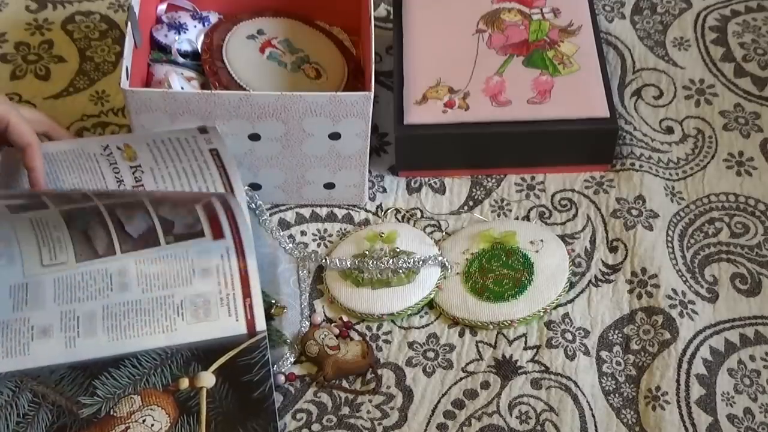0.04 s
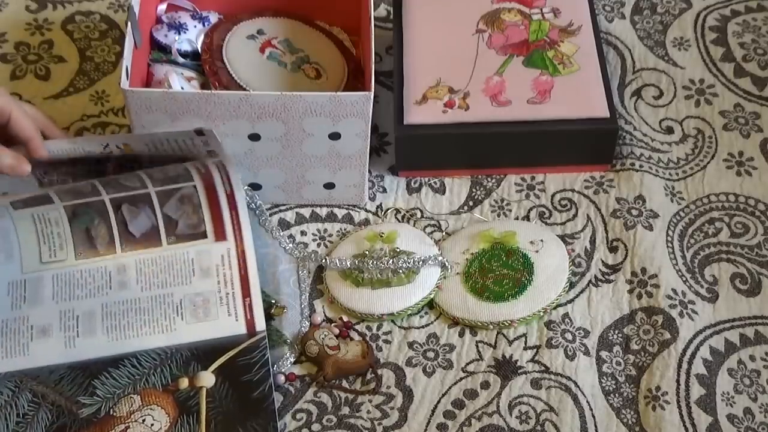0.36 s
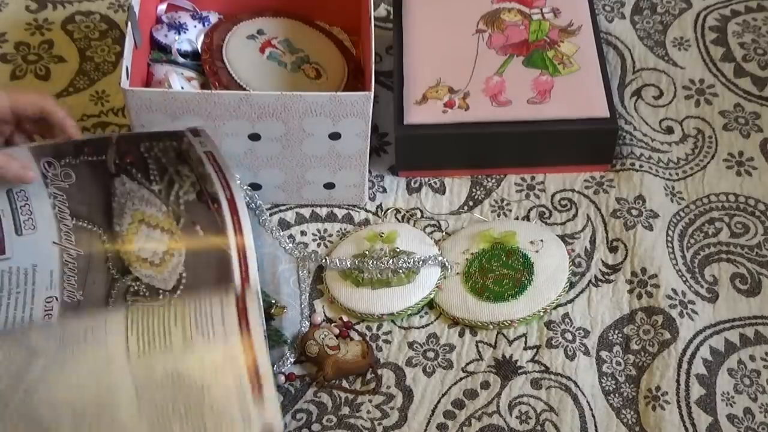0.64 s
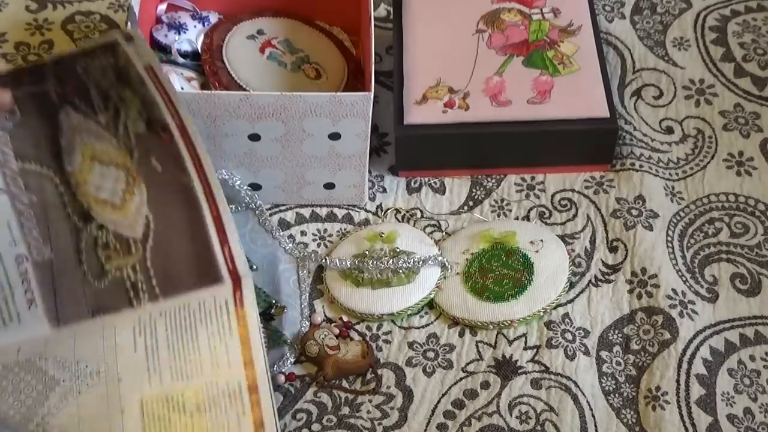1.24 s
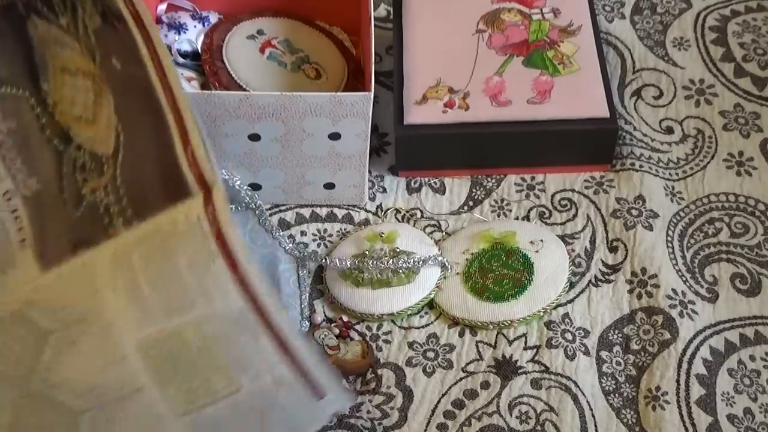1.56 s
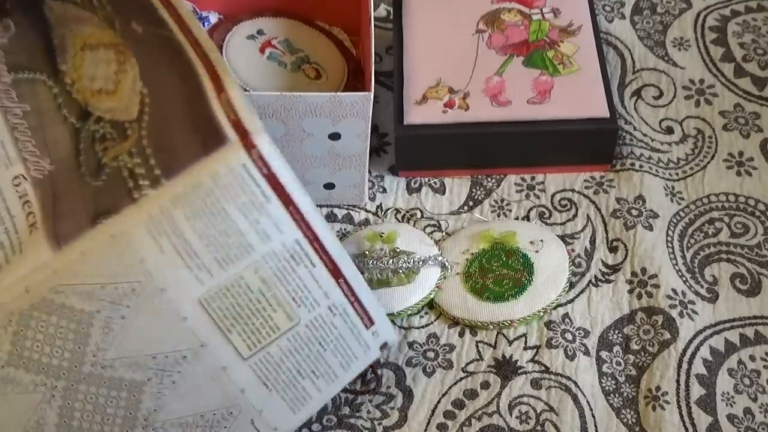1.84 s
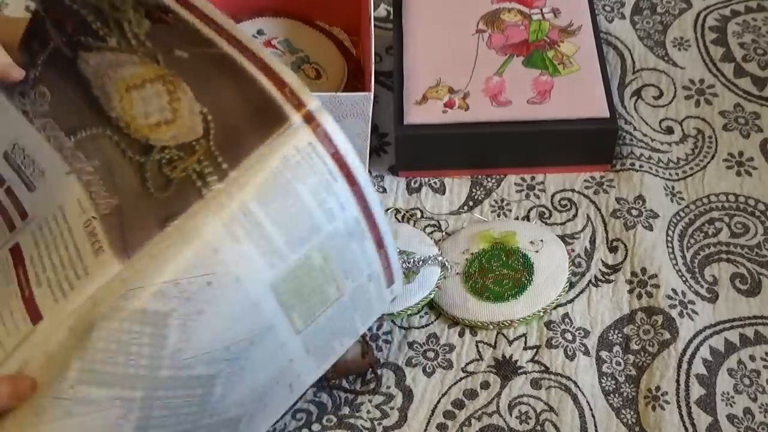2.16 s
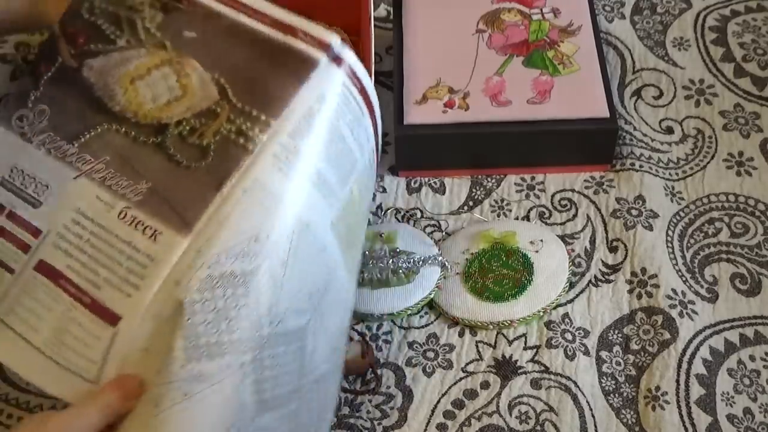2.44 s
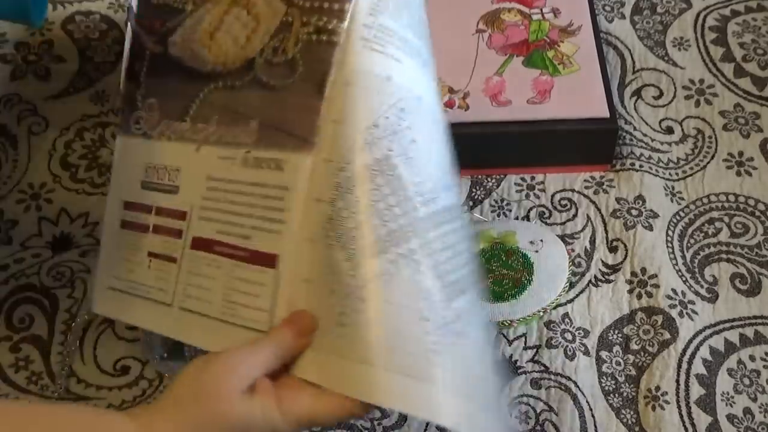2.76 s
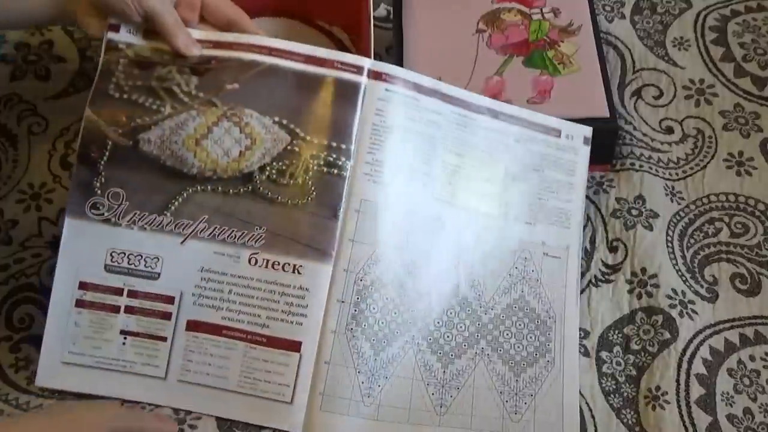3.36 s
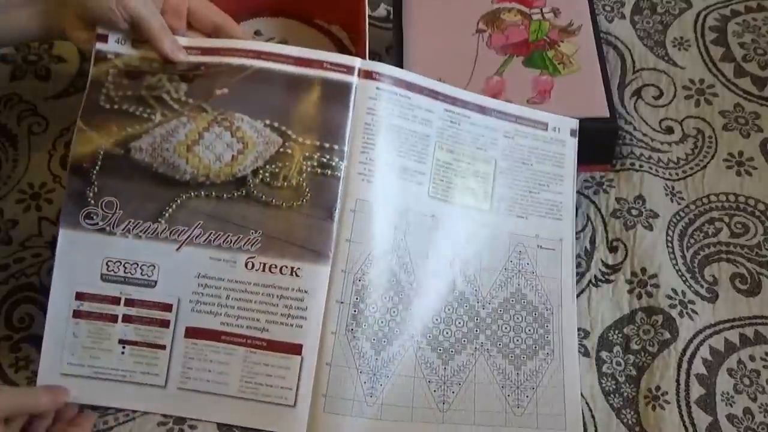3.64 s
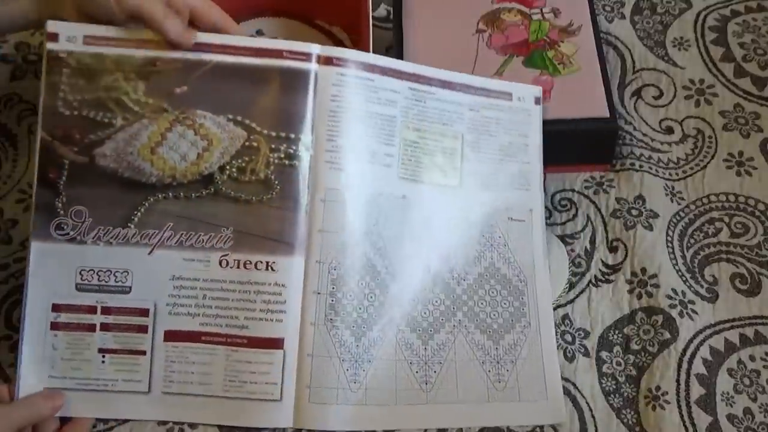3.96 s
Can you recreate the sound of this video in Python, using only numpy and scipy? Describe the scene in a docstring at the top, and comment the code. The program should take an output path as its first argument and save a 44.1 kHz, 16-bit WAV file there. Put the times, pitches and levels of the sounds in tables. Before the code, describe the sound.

Magazine pages rustle close by, starting slightly left with sharp, hollow-sounding snaps in the first 0.4 seconds. Lighter crackles and rasping, hissing slides follow over a soft handling rumple, with dull flaps at about 2.1 to 2.3 seconds. Around 3.1 seconds the pages snap and flap open near the middle. Small ticks and one more slide follow near 3.9 seconds, over the faint hiss of a small, quiet room.

```python
"""Paper rasps and snaps as a glossy magazine is leafed through, turned round and opened on a table.
Sheets slide over each other with a grainy rasp and a fine hiss; they buckle in sharp snaps and land
in dull flaps. The whole stack rumples softly in the hands, and air under the lifted pages rings hollow.
The magazine is close by, starting on the left and ending near the middle of a small, quiet room."""
import sys
import numpy as np
from scipy import signal
from scipy.fft import rfft, irfft, next_fast_len
from scipy.io import wavfile
from scipy.ndimage import map_coordinates

SR = 44100
rng = np.random.default_rng(int(sys.argv[2]) if len(sys.argv) > 2 else 0)


def log_audio(samples):
    """Write samples as a 16-bit WAV file to the path given in sys.argv[1]."""
    # one column per channel
    frames = np.atleast_2d(samples).T
    # limit to full scale, then quantise
    limited = np.clip(frames, -1, 1)
    pcm = np.round(limited * 32767).astype(np.int16)
    wavfile.write(sys.argv[1], SR, pcm)


N = 176400  # 4 seconds
FFT_SIZE = next_fast_len(N + SR // 2)  # spare room so that filters can ring out
FFT_HZ = np.fft.rfftfreq(FFT_SIZE, 1 / SR)


def amp(db):
    """Turn decibels into a number to multiply by."""
    return 10 ** (np.asarray(db) / 20)


def unit(x):
    """Scale a sound so that its average (rms) level is 1."""
    return x / np.sqrt(np.mean(x ** 2) + 1e-20)


def unit_energy(stereo):
    """Scale a stereo sound so that its left side has a total energy of 1."""
    return stereo / np.linalg.norm(stereo[0])


def along(points, hz):
    """Read between (Hz, value) points, giving each octave equal space."""
    point_hz, values = np.transpose(points)
    return np.interp(np.log(hz + 1), np.log(point_hz + 1), values)


def curve(points):
    """Join (seconds, value) points with straight lines, one value for each sample."""
    return np.interp(np.arange(N) / SR, *np.transpose(points))


def wobble(per_s, size):
    """A smooth curve through per_s random values each second."""
    return map_coordinates(rng.standard_normal(2048), [np.arange(size) * per_s / SR], mode="wrap")


def coloured(x, gain):
    """Filter a sound: gain(hz) says how much of each frequency gets through."""
    size = x.shape[-1]
    padded = 2 * next_fast_len(size // 2 + 2048)
    cepstrum = irfft(np.log(np.maximum(gain(np.fft.rfftfreq(padded, 1 / SR)), 1e-6)))
    # Folding the second half onto the first makes the filter ring after a sound, never before it.
    cepstrum[1:padded // 2] *= 2
    cepstrum[padded // 2 + 1:] = 0
    return irfft(rfft(x, padded) * np.exp(rfft(cepstrum)), padded)[..., :size]


def paper_band(centre_hz, octaves, skirt_db=-44):
    """The broad resonance of bent paper: a hump around one pitch, with a weak skirt either side."""
    def gain(hz):
        hump = np.exp(-(np.log2((hz + 1) / centre_hz) / (2 * octaves)) ** 2)
        skirt = amp(skirt_db) * hz / (hz + 300)
        return (hump + skirt) / np.sqrt(hz + 120)
    return gain


def spread(pair, side_db):
    """Make stereo from two unrelated sounds; a higher side_db sounds wider."""
    mid, side = pair[0], amp(side_db) * pair[1]
    return np.array([mid + side, mid - side])


def friction(size, catches_per_s=1500, catch_share=0.36):
    """Paper fibres catching: two streams of tiny clicks of random size over a smooth rub."""
    catches = (rng.random((2, size)) < catches_per_s / SR) * rng.choice([-1, 1], (2, size))
    catch_db = 2 * np.minimum(rng.exponential(size=(2, size)), 4)
    rub = rng.standard_normal((2, size))
    return np.sqrt(catch_share) * unit(catches * amp(catch_db)) + np.sqrt(1 - catch_share) * rub


def sliding_sheets():
    """Each slide swells and fades, juddering; the sheet rasps and its coating hisses."""
    # Each row: peak time, rise time and fall time in seconds, then the rasp's level in dB,
    # centre in Hz and width in octaves, then the same three for the hiss.
    slides = [(.003, 0.014, 0.022, -35.5, 1600, 0.8, -52, 10500, 0.35),
              (.066, 0.026, 0.0094, -33, 3100, 0.59, -40, 10900, 0.22),
              (0.086, 0.019, 0.051, -38.5, 3070, 1.7, -43, 9300, 0.25),
              (.18, 0.05, 0.19, -45, 3250, 0.63, -50.5, 11800, 0.22),
              (0.273, 0.021, 0.012, -41, 2480, 1.1, -50, 11600, 0.27),
              (0.401, 0.024, .11, -48, 3240, 1.25, -59, 11200, 0.13),
              (0.573, 0.033, 0.018, -37, 1520, 0.75, -71, 10900, .3),
              (.64, 0.088, 0.038, -49, 3050, 0.71, -50.5, 11100, 0.22),
              (.7, 0.02, 0.016, -37, 1210, 0.74, -53.5, 9800, 0.16),
              (0.759, 0.031, 0.02, -51, 1100, 0.23, -77, 11000, 0.46),
              (.865, 0.024, 0.012, -47.5, 1400, 0.46, -73, 11000, 0.3),
              (0.919, 0.044, .04, -52.5, 2520, 0.8, -53, 10300, .17),
              (.988, 0.038, 0.032, -44, 1840, 0.97, -47, 11000, 0.42),
              (1.049, 0.012, 0.0054, -43.5, 3300, 1, -41.5, 11700, 0.24),
              (1.13, 0.14, 0.066, -51, 1800, 1.75, -63, 11800, 0.14),
              (1.248, 0.065, 0.12, -46, 3000, 1.46, -49.5, 9300, 0.75),
              (1.4, 0.016, 0.023, -48.5, 3420, 0.68, -63, 9500, .4),
              (1.462, 0.016, 0.0047, -47, 3830, .7, -54, 9500, 0.26),
              (1.525, .012, .028, -41, 2450, 0.71, -54, 10000, 0.41),
              (1.639, 0.022, 0.02, -38.5, 3450, 0.79, -47, 11200, 0.32),
              (1.718, 0.077, .05, -50.5, 3020, 1.5, -48, 11700, 0.15),
              (1.77, 0.14, 0.11, -53, 4160, 0.28, -53.5, 10500, 0.58),
              (1.859, 0.0097, 0.033, -46, 4280, 1.5, -47.5, 10500, 0.99),
              (1.943, 0.05, 0.042, -51.5, 5060, 0.2, -57, 11300, 0.15),
              (2.069, 0.031, 0.051, -47, 2760, 1.43, -51, 11700, 0.29),
              (2.17, 0.083, 0.053, -47, 5250, 0.35, -48, 10800, 0.31),
              (2.148, 0.027, 0.058, -45, 503, 2.7, -65, 11100, 0.35),
              (2.395, 0.065, 0.077, -55.5, 4960, 0.42, -48, 12700, 0.38),
              (2.52, 0.039, 0.052, -55.5, 4860, .4, -56, 11300, 0.46),
              (2.741, 0.12, 0.044, -50, 3200, 0.96, -51, 12000, 0.27),
              (2.826, 0.074, 0.051, -45, 1460, 1.65, -48, 11400, 0.33),
              (2.986, 0.029, 0.034, -45, 500, 1.5, -43, 11300, 0.67),
              (3.103, 0.015, 0.022, -41.5, 504, 0.55, -46.5, 11000, 0.72),
              (3.139, .02, 0.038, -49, 2500, 1.6, -48.5, 11000, 0.41),
              (3.163, 0.0084, 0.028, -45, 453, 2.7, -47, 11000, 0.67),
              (3.57, 0.051, 0.058, -52, 2800, 1.07, -59, 11000, .3),
              (3.618, 0.02, 0.018, -47, 5900, 0.14, -52, 11000, .3),
              (3.714, 0.017, 0.047, -54, 5350, 0.29, -61, 11000, 0.26),
              (3.828, 0.021, 0.057, -51.5, 3700, 0.39, -63, 12300, 0.067),
              (3.904, 0.097, 0.12, -51.5, 3900, 0.93, -46, 12100, 0.21)]
    fade_db, judder_db = 9.5, 1.3  # the drop over one rise or fall time; the size of the unevenness
    out, size = np.zeros((2, N)), SR // 2
    t = (np.arange(size) - size // 2) / SR  # zero at the peak
    for peak_s, rise_s, fall_s, rasp_db, rasp_hz, rasp_octaves, hiss_db, hiss_hz, hiss_octaves in slides:
        swell_db = -fade_db * np.abs(t / np.where(t < 0, rise_s, fall_s)) ** 1.27
        rasp = spread(unit(coloured(friction(size), paper_band(rasp_hz, rasp_octaves))), side_db=-11.5)
        hiss = unit(coloured(friction(size)[0], paper_band(hiss_hz, hiss_octaves)))
        loudness = amp(swell_db + judder_db * wobble(per_s=190, size=size))
        add(out, peak_s + t[0], loudness * (amp(rasp_db) * rasp + amp(hiss_db) * hiss))
    return out


def handling():
    """The whole stack of pages flexes in the hands with a soft, lumpy rumple."""
    # Each row: time in seconds, level of the rumple in dB.
    levels = [(0, -49.5), (.14, -51.5), (.2, -57), (.48, -59), (.58, -55.5), (.8, -58.5), (1.5, -58),
              (1.75, -56.5), (2.25, -57.5), (2.62, -61), (2.85, -56.5), (3.03, -61), (3.2, -56.5),
              (3.45, -56), (3.7, -57.5), (3.87, -58.5), (4, -51)]
    # Each row: frequency in Hz, relative strength of the rumple there in dB.
    tone = [(60, -7.5), (180, -2.5), (340, 3.5), (600, -2), (1200, 0.5), (3000, -15), (9000, -61.5)]
    rumple = spread(unit(coloured(friction(N), lambda hz: amp(along(tone, hz)))), side_db=-2.5)
    lumps_db = 2.8 * wobble(per_s=55, size=N)
    return rumple * amp(curve(levels) + lumps_db)


def background(hiss_db=-54.5, hum_hz=49.5, hum_db=-66.5):
    """A faint, steady hiss and a low, wavering hum."""
    # Each row: frequency in Hz, relative strength of the hiss there in dB.
    tone = [(20, -24), (36, -28), (50, 1.5), (90, -4), (160, -7), (400, -17.5), (1000, -14.5),
            (3000, -16.5), (6000, -19), (11000, -21.5), (15500, -20.5)]
    hiss = unit(coloured(rng.standard_normal((2, N)), lambda hz: amp(along(tone, hz))))
    hum_phase = 2 * np.pi * hum_hz * np.arange(N) / SR + .5 * wobble(per_s=6.24, size=N)
    hum = unit(np.sin(hum_phase) * amp(0.83 * wobble(per_s=3.1, size=N)))
    return amp(hiss_db) * spread(hiss, side_db=-8) + amp(hum_db) * hum


def buckling_sheets(gain_db=14, crunch_db=1, shiver_pitch_ratio=0.83):
    """A buckle gives way in one push with a crunch of tiny breaks, then the sheet shivers lower down."""
    # Each row: start in seconds, relative strength in dB, centre in Hz, width in octaves, and the
    # shiver in dB compared with its snap. A big buckle has two rows: a bright crack and a dull flap.
    snaps = [(.006, -28.5, 1520, 1.07, -4), (0.014, -29, 1670, 1.3, -3), (.043, -25, 3350, 1.3, -11),
             (0.06, -39, 2900, 0.78, -10), (0.0787, -13.5, 3700, 0.6, -6.5), (0.0788, -18, 9350, 0.57, -4),
             (0.1197, -21, 2040, 1.35, -5), (.1458, -18.5, 2370, 1.32, -7.5), (.145, -30, 204, 0.39, -7),
             (.3457, -16.5, 2460, 0.55, -10), (0.3471, -23, 840, 0.45, -10.5), (.531, -29, 1570, 0.71, -6),
             (0.5594, -24, 1270, 0.32, 0.5), (.5724, -22.5, 2100, 0.49, -22),
             (.584, -25.5, 1290, 0.46, -2.5), (0.655, -33.5, 1490, 0.64, 2),
             (0.687, -33.5, 1600, 0.94, -20), (0.7017, -29.5, 1100, 0.88, -17),
             (.745, -26, 1060, 0.17, -11), (.855, -38, 2030, 2.3, -16), (.933, -35, 2330, 0.48, -1),
             (0.99, -34.5, 2170, 0.52, 3.5), (1.13, -34, 1100, 0.5, -3), (1.2781, -23.5, 990, 0.53, -10),
             (1.395, -43, 3500, 1.1, -7), (1.4842, -38, 2570, 0.37, -12), (1.5151, -32, 800, 1.16, -5),
             (1.7946, -35, 1930, 0.35, -4), (1.945, -35, 2030, 1.2, 2.5), (1.98, -36.5, 600, 1.7, -2),
             (2.0105, -34.5, 2200, 0.87, -11), (2.124, -28.5, 2030, 0.79, -10), (2.139, -34, 1500, 1.6, 0),
             (2.148, -26, 1240, 0.45, -23), (2.1471, -27.5, 320, 0.45, -20),
             (2.3147, -36.5, 410, 0.41, -14), (2.339, -23, 563, 0.62, -7.5), (2.533, -40.5, 3430, 1.05, 2),
             (2.822, -40, 2300, 2.3, -1), (2.8387, -46, 1560, 2.1, -17), (2.895, -33.5, 466, 0.43, -15),
             (2.9266, -38, 840, 0.82, -1.5), (3.0002, -34, 550, 0.51, 4), (3.0776, -17, 1950, 0.4, -23),
             (3.0782, -19.5, 9500, 0.38, -26), (3.081, -27, 435, 0.6, 1.5),
             (3.0911, -16.5, 1550, 0.27, -11), (3.1308, -34, 9400, 0.42, 0),
             (3.1509, -22.5, 1220, 0.68, -4), (3.151, -25, 387, 0.53, 0.5), (3.307, -38, 4200, 1.0, -3),
             (3.3305, -33, 925, 1.8, -12), (3.345, -37, 2450, 2.1, -19), (3.371, -37, 3500, 1, -23),
             (3.4121, -28.5, 9700, 0.31, -30), (3.4115, -33.5, 590, 1.04, -16),
             (3.447, -39.5, 1200, 0.8, -19), (3.817, -34, 11700, 0.24, -16),
             (3.828, -28.5, 11600, 0.076, -21), (3.84, -34, 11500, 0.4, 2)]
    out, size = np.zeros((2, N)), SR // 6
    t = np.arange(size) / SR

    def burst(fade_s):
        """Noise that dies away by 60 dB in fade_s seconds."""
        return unit_energy(rng.standard_normal((2, size)) * amp(-60 * t / fade_s))

    for start_s, strength_db, hz, octaves, shiver_db in snaps:
        crunch = spread(burst(fade_s=0.0061), side_db=-14.5)
        push = (t == 0) + amp(crunch_db) * crunch
        snap = unit_energy(across_sheet(coloured(push, paper_band(hz, octaves))))
        shaking = spread(burst(fade_s=0.18), side_db=-13)
        shiver = unit_energy(coloured(shaking, paper_band(hz * shiver_pitch_ratio, octaves)))
        add(out, start_s, amp(strength_db + gain_db) * (snap + amp(shiver_db) * shiver))
    return out


def across_sheet(snap, lag_at_1khz_s=0.001083):
    """Low notes cross a bending sheet more slowly, so a snap becomes a tiny downward chirp."""
    hz = np.fft.rfftfreq(snap.shape[-1], 1 / SR)
    phase_lag = lag_at_1khz_s * 4 * np.pi * np.sqrt(1000 * hz)
    return irfft(rfft(snap) * np.exp(-1j * phase_lag), snap.shape[-1])


def air_pocket(sheets):
    """The air between the lifted pages rings hollow, and less so as they open."""
    # Each row: pitch of one ringing note in Hz, its width in Hz, its gain in dB.
    notes = [(234, 37, -13.5), (1250, 44, 10), (1400, 100, 3), (1530, 33, -2), (1686, 36, 3),
             (2750, 40, -9)]
    # Each row: time in seconds, how strongly the paper stirs the air in dB.
    drive = [(0, 0.5), (.15, 7), (.3, -2), (.6, -5.5), (.9, -11), (1.5, -10)]
    ring = sum(amp(db) * 1j * FFT_HZ * width / (hz ** 2 - FFT_HZ ** 2 + 1j * FFT_HZ * width)
               for hz, width, db in notes)
    return irfft(rfft(sheets * amp(curve(drive)), FFT_SIZE) * ring, FFT_SIZE)[:, :N]


def left_to_middle(sheets):
    """The nearer side is louder, most around 4500 Hz, where a camera body shades the far microphone."""
    # Each row: time in seconds, how much louder the left is in dB at the most shaded frequency.
    left_lead = [(0, 3), (2.2, 3.8), (2.9, .3), (4, 1.3)]
    # Each row: frequency in Hz, share of that lean which applies there (0 to 1).
    shade = [(300, .1), (1000, 0.38), (2000, 0.36), (4500, 1), (8000, 0.7), (13000, .2)]
    lean = sheets * (amp(np.outer([.5, -.5], curve(left_lead))) - 1)
    return sheets + irfft(rfft(lean, FFT_SIZE) * along(shade, FFT_HZ), FFT_SIZE)[:, :N]


def room_echo(paper):
    """The short echo of a small furnished room; the high notes die first."""
    # Each row: frequency in Hz, seconds the echo takes to fade by 60 dB.
    fade_times = [(150, 0.35), (1500, 0.22), (5000, 0.18), (14000, 0.053)]
    hz, t, noise = signal.stft(rng.standard_normal((2, SR // 2)), SR, nperseg=256)
    fading = noise * amp(-60 * t / along(fade_times, hz)[:, None])
    tail = spread(signal.istft(fading, SR, nperseg=256)[1], side_db=-7.5)
    delayed_tail = np.pad(unit_energy(tail), ((0, 0), (SR // 300, 0)))
    return signal.fftconvolve(paper, delayed_tail, axes=1)[:, :N]


def add(track, start_s, sound):
    """Mix a stereo sound into the track, dropping whatever falls outside it."""
    start = round(start_s * SR)
    first, end = max(start, 0), min(start + sound.shape[-1], N)
    track[:, first:end] += sound[:, first - start:end - start]


def scene(echo_db=-14.5):
    """All the paper sounds, their echo and the quiet background."""
    sheets = sliding_sheets() + buckling_sheets()
    paper = left_to_middle(sheets) + air_pocket(sheets) + handling()
    return paper + amp(echo_db) * room_echo(paper) + background()


def record(dry, mono_below_hz=460, top_hz=15850):
    """Two microphones close together: alike in the bass, uneven in the treble, deaf above top_hz."""
    # Each row: frequency in Hz, how much the microphones lift or cut it in dB.
    response = [(100, -3), (340, 1), (520, 0.5), (780, -2), (1200, -4), (3000, 0.5), (5200, 2), (6000, 0),
                (6600, -7), (7200, -3.5), (8000, -1), (9500, 0.5), (11000, 1.5), (12500, .5), (14000, -4.5),
                (15500, -3.5)]
    spectrum = rfft(coloured(dry, lambda hz: amp(along(response, hz))), FFT_SIZE)
    mid = spectrum.mean(axis=0)
    side = (spectrum - mid) * FFT_HZ / np.hypot(FFT_HZ, mono_below_hz)
    return irfft((mid + side) * (FFT_HZ < top_hz), FFT_SIZE)[:, :N]


dry = scene()
out = record(dry)
log_audio(out)
```